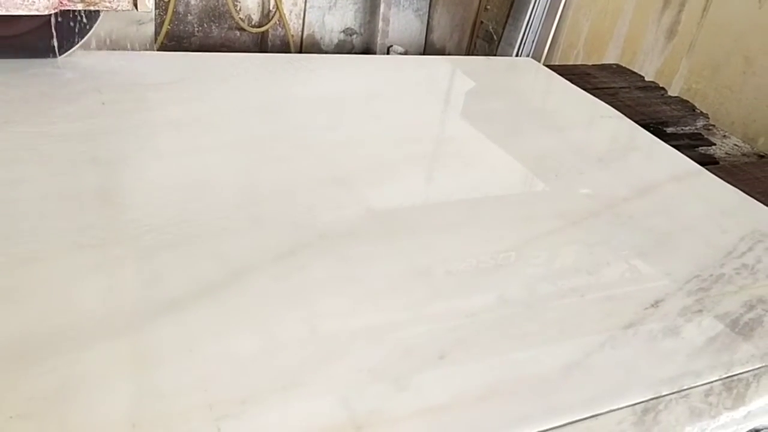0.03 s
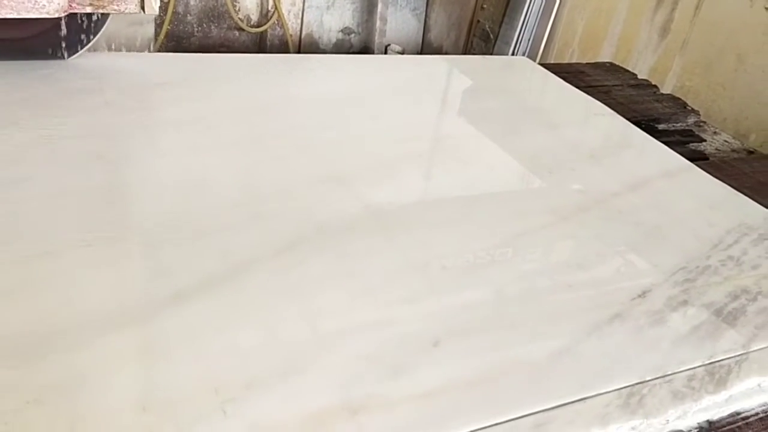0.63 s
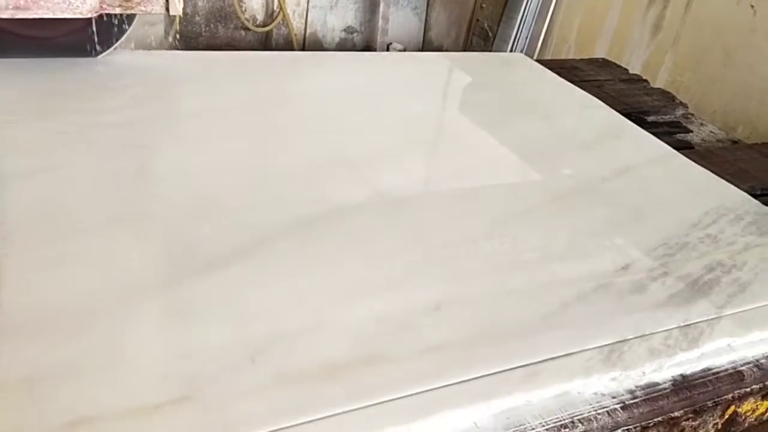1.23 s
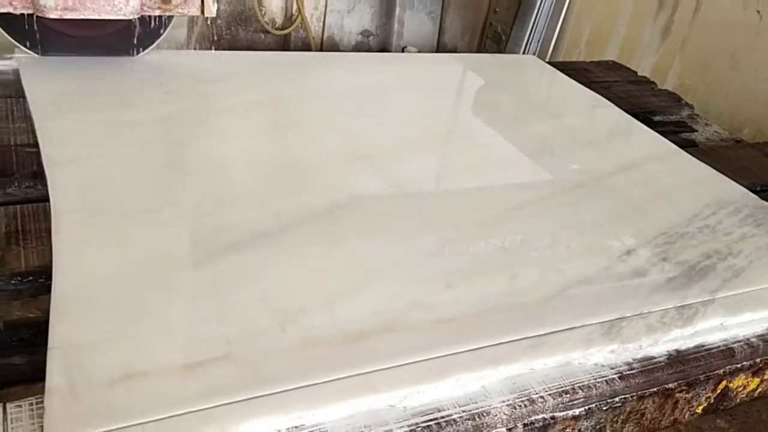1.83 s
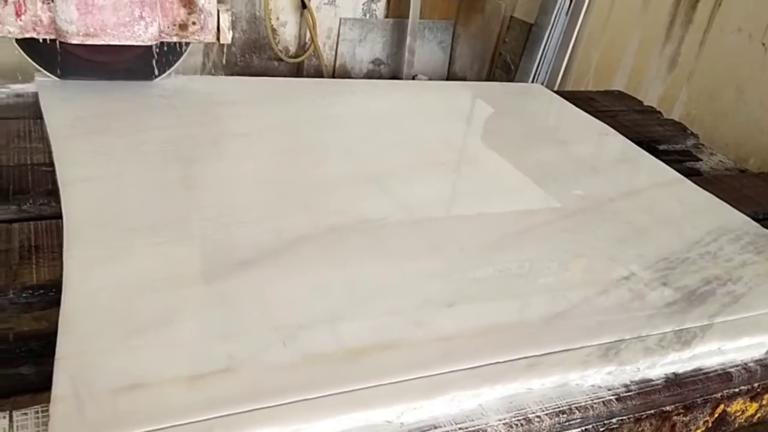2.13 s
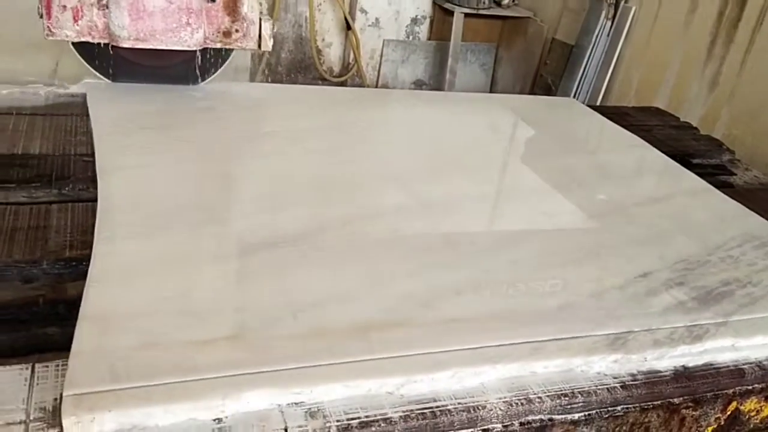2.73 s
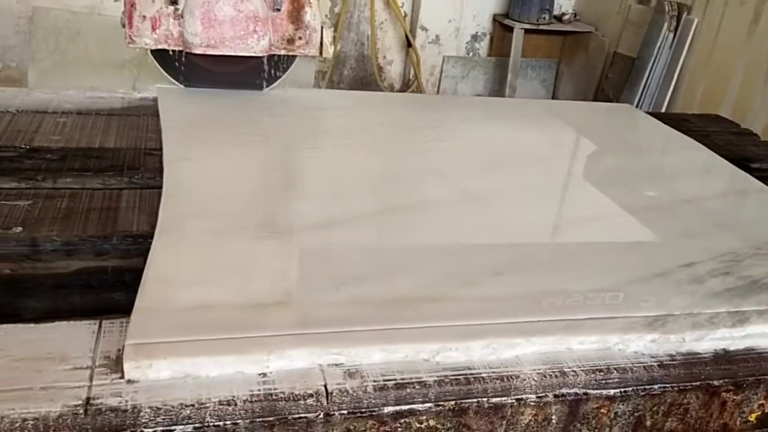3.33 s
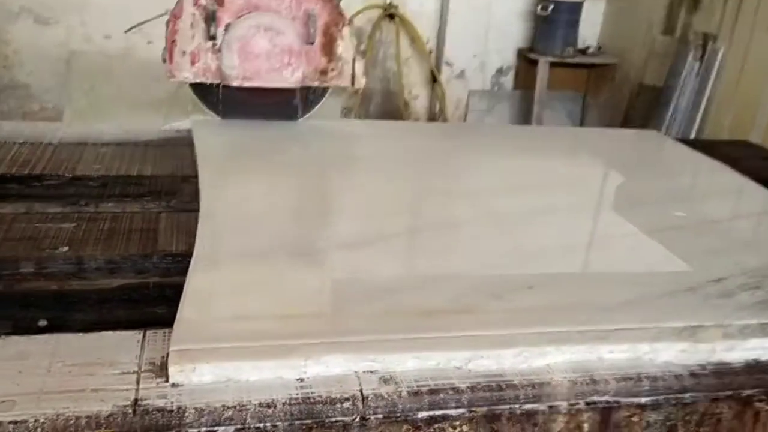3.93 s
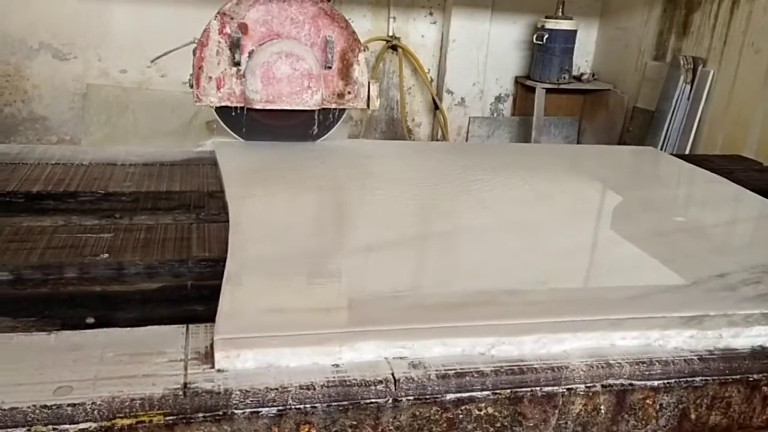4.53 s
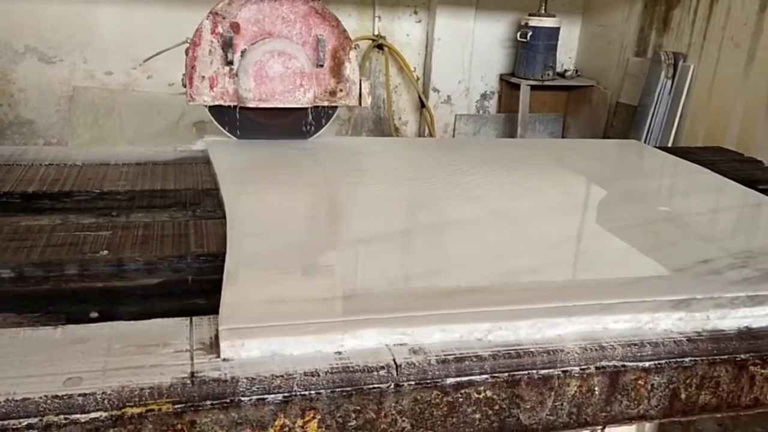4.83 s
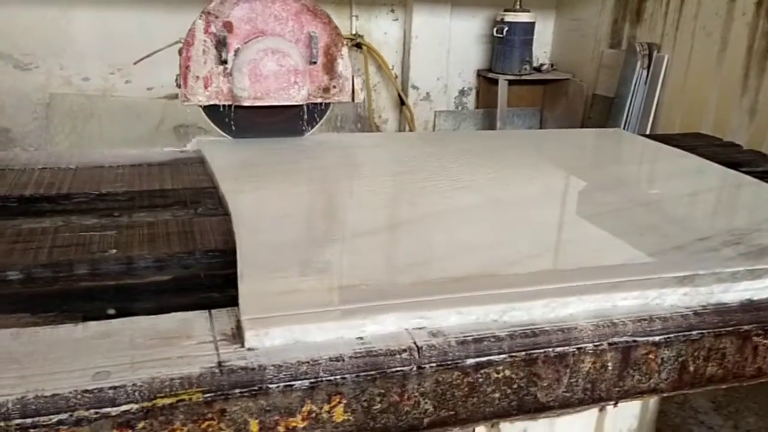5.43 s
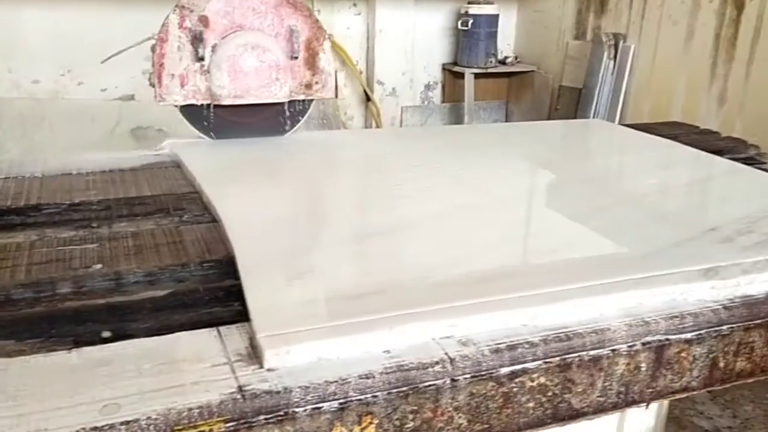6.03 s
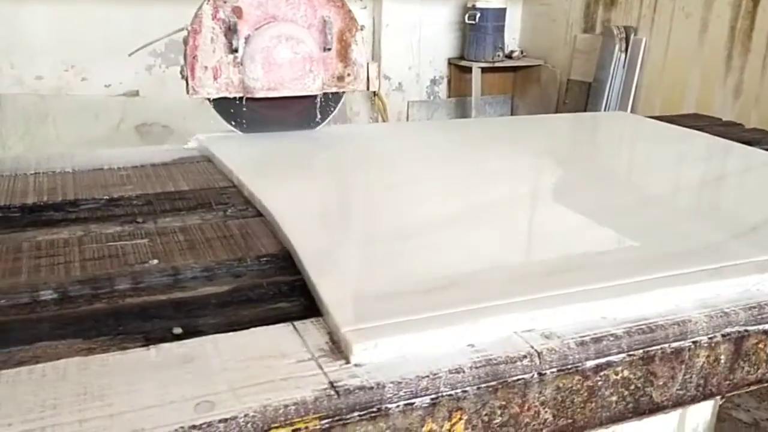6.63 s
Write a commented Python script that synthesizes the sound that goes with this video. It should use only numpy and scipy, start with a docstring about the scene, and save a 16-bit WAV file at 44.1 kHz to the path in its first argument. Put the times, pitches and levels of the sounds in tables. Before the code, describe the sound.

In a stone workshop, a circular saw is already cutting, a loud gritty grind with a metallic ring and short squeals at changing pitches. Beneath it runs a quieter, wavering machine drone, and above it a fine hiss of spray. Light thuds and finger rumble touch the nearby stereo microphone at the start, mostly on the right. The cut carries on throughout, changing colour as the microphone is carried around the blade.

```python
"""Bridge saw in wet marble

A stone workshop, the stereo microphone carried along the saw table from the blade's edge to its face.
The rim grinds almost the same pattern every turn, so the steel blade rings in combs of shaft orders;
single modes flare up as it rubs. The spindle drones under its guard and spray hisses.
In the first second, handling bumps the right microphone port."""
import sys
import numpy as np
from scipy import signal
from scipy.fft import rfft, irfft
from scipy.io import wavfile
from scipy.ndimage import uniform_filter1d

SR = 44100
rng = np.random.default_rng(int(sys.argv[2]) if len(sys.argv) > 2 else 0)


def transcribe(u):
    """Save the signal u as a 16-bit wav file named by the first command-line argument.

    u: samples, shape (n,) or (channels, n), limited to [-1, 1]; the rate is SR.
    q: integer samples, one column per channel.
    """
    v = np.clip(np.atleast_2d(u).T, -1, 1)
    q = np.round(v * 32767).astype(np.int16)
    wavfile.write(sys.argv[1], SR, q)


N = 295470
TIME = np.arange(N) / SR

SHAFT_HZ, BELT_HZ = 25.113, 3.42  # a shaft order is a multiple of SHAFT_HZ
LONG_WAVE_HZ = 870  # below this the cut sounds much the same from everywhere
SPRAY_HZ = 8750  # above this the spray takes over from the blade


def amp(db):
    """Decibels to gain."""
    return 10 ** (np.asarray(db) / 20)


def unit(x):
    """Scales to an rms of one."""
    return x / np.sqrt(np.mean(abs(x) ** 2) + 1e-20)


def across(points, hz):
    """Reads rows of (Hz, value) on a log-frequency axis."""
    f, value = np.transpose(points)
    return np.interp(np.log(hz + 1), np.log(f + 1), value)


def along(points, t):
    """Reads rows of (seconds, value) at the times t."""
    return np.interp(t, *np.transpose(points))


def swing(curve, t):
    """A level curve in dB about its own average."""
    db = along(curve, t)
    return db - db.mean()


def spectra(x):
    """Short-time spectra, for shaping the cut's colour and ring over time."""
    return signal.stft(x, SR, nperseg=2048, noverlap=1536)


def drift(rate_hz):
    """A slow, complex random wander with an rms near one."""
    t = np.arange(0, 8, .005)
    hz = np.fft.fftfreq(len(t), t[1])
    noise = rng.standard_normal((len(t), 2)) @ [1, 1j]
    return np.interp(TIME, t, unit(np.fft.ifft(noise / (1 + (hz / rate_hz) ** 2))))


def patches(shape, size):
    """Smooth random blotches over frequency and time; size is (bins, frames)."""
    field = rng.standard_normal(shape)
    for axis in (0, 1, 0, 1):
        field = uniform_filter1d(field, size[axis], axis, mode="wrap")
    return unit(field)


def belt_angle(t, top_s=.335):
    """Angle of the drive belt on its lap, in radians."""
    return 2 * np.pi * BELT_HZ * (t - top_s)


def shaft_turns(wobble_hz=.028, ease_hz=.03, ease_s=5.5):
    """Turns made by the shaft: its speed wobbles with the belt and rises as the load eases."""
    eased = np.clip((TIME - ease_s) * BELT_HZ + .5, 0, 1)
    return np.cumsum(SHAFT_HZ + wobble_hz * np.cos(belt_angle(TIME)) + ease_hz * eased) / SR


def rim_scrape(memory_s=0.62, oversample=10):
    """One turn's scrape comes round again and again; its orders slip in phase as the stone wears."""
    # Uneven rim segments whine steadily. Each row: shaft order, dB above the other orders.
    whine = [(35, 5), (43, 4), (48, 3), (52, 4), (54, 5), (63, 6), (74, 5), (99, 2), (130, 2), (177, 5),
             (264, 4)]
    turn_samples = round(SR / SHAFT_HZ)
    strength = np.ones(turn_samples // 2 + 1)
    for order, db in whine:
        strength[round(order)] = amp(db)
    slips = rng.standard_normal((2, N // turn_samples + 2, len(strength)))
    slips *= np.sqrt(2 / (SHAFT_HZ * memory_s))
    phase = 2 * np.pi * rng.random((2, 1, len(strength))) + np.cumsum(slips, axis=1)
    track = irfft(strength * np.exp(1j * phase), oversample * turn_samples).reshape(2, -1)
    place = shaft_turns() * oversample * turn_samples
    return unit(np.array([np.interp(place, np.arange(len(side)), side) for side in track]))


def blade_ring(hz, steel_db=2.5, damping=0.66):
    """Gain over frequency: the steel blade's modes stand above a bed of grit."""
    # Blade modes. Each row: pitch in Hz, half width in Hz before damping scales it, relative dB.
    modes = [(802.0, 54.0, -8.5), (886.0, 34.0, -5.5), (1110.0, 47.0, -11.5), (1213.0, 33.0, -1.5),
             (1348.0, 37.0, -6.0), (1452.0, 57.0, -4.0), (1578.0, 38.0, -3.5), (1736.0, 194.0, -10.0),
             (1955.0, 59.0, -6.0), (2159.0, 50.0, -7.5), (2236.0, 37.0, -3.0), (2484.0, 35.0, -3.0),
             (2566.0, 43.0, -8.0), (2730.0, 141.0, -8.5), (2870.0, 50.0, -3.0), (3033.0, 52.0, -2.0),
             (3242.0, 66.0, -1.5), (3423.0, 95.0, -7.0), (3573.0, 100.0, -4.0), (3714.0, 47.0, -5.0),
             (3844.0, 54.0, -4.5), (4013.0, 29.0, -3.0), (4177.0, 34.0, -3.5), (4448.0, 24.0, 1.0),
             (4768.0, 81.0, -3.0), (5074.0, 116.0, -3.5), (5553.0, 127.0, -10.5), (5944.0, 108.0, -10.5),
             (6218.0, 70.0, -10.0), (6426.0, 65.0, -6.5), (6612.0, 95.0, -2.0), (6850.0, 61.0, -5.0),
             (7115.0, 48.0, -3.5), (7390.0, 127.0, -9.0), (7718.0, 98.0, -12.5)]
    # Crushed stone and spray between the modes. Each row: frequency in Hz, relative level in dB.
    grit = [(30.0, -44.0), (100.0, -26.5), (300.0, -13), (560.0, -15), (700.0, -17.5), (1020.0, -20),
            (1300.0, -13.5), (2000.0, -15.5), (2700.0, -13), (3600.0, -32.5), (4500.0, -6.5), (5300.0, -15),
            (7400.0, -25), (8100.0, -19.5), (9500.0, -17.5), (10400.0, -21), (11300.0, -11),
            (12400.0, -9.5), (13400.0, -14.5), (15000.0, -15)]
    steel_power = sum(amp(db + steel_db) ** 2 / (1 + ((hz - f) / (damping * width)) ** 2) ** 2
                      for f, width, db in modes)
    return np.sqrt(steel_power + amp(across(grit, hz)) ** 2)


def squeals(hz, t, base_width_hz=13, loss=0.015):
    """Lift in dB as the blade rubs in the kerf: single modes swell, hold and let go."""
    # Each row: middle in seconds, length in seconds, pitch in Hz, lift in dB.
    flares = [(0.0, 1.8, 3071.0, 11.5), (0.3, 1.0, 2474, 7.5), (0.47, 0.81, 1759.0, 8.5),
              (0.65, 0.43, 4665.0, 10.5), (0.98, 0.16, 3300, 14), (1.03, 0.16, 2557.0, 6.5),
              (1.07, 0.32, 2232.0, 13.0), (1.1, 0.37, 4336.0, 8.5), (1.35, 0.13, 3358.0, 5.5),
              (1.37, 0.26, 3808.0, 9.5), (1.37, 0.4, 1858.0, 18.5), (1.42, 0.26, 4445, 10),
              (1.42, 0.32, 2486, 16), (1.46, 0.65, 1456.0, 7.0), (1.58, 0.31, 1982.0, 12.0),
              (1.91, 0.81, 4085.0, 9.5), (1.92, 0.3, 4445, 7.5), (2.0, 1.31, 1751.0, 13.5),
              (2.05, 0.27, 2812.0, 10.0), (2.14, 0.69, 2227.0, 11.5), (2.18, 0.52, 2485, 14.5),
              (2.19, 0.23, 1583.0, 13.0), (2.51, 0.22, 6229.0, 13.5), (2.56, 0.16, 6877.0, 4.5),
              (2.79, 0.21, 4093.0, 12.0), (2.85, 0.22, 1356.0, 14.0), (2.96, 0.43, 2456, 9),
              (3.0, 0.19, 3489.0, 12.0), (3.14, 0.16, 4442.0, 8.0), (3.21, 0.5, 1694.0, 12.5),
              (3.31, 0.65, 2761.0, 12.5), (3.48, 0.35, 2159.0, 10.0), (3.58, 0.15, 1374.0, 7.5),
              (3.6, 2.88, 1553.0, 7.0), (3.8, 0.28, 3254.0, 9.0), (3.94, 0.27, 2486, 14),
              (3.97, 0.41, 5485.0, 12.5), (3.98, 0.36, 2854.0, 9.0), (4.01, 0.36, 5149.0, 13.0),
              (4.04, 0.25, 2236.0, 9.0), (4.11, 0.32, 3572.0, 10.5), (4.22, 0.8, 3001.0, 9.0),
              (4.26, 0.2, 4353.0, 11.0), (4.34, 0.13, 2814.0, 14.0), (4.44, 0.89, 1618.0, 10.0),
              (4.55, 0.54, 1782.0, 8.5), (4.56, 0.13, 4013.0, 10.5), (4.58, 0.3, 2460, 11),
              (4.6, 1.62, 6022.0, 12.0), (4.89, 0.24, 4640.0, 9.0), (5.01, 0.23, 2550.0, 8.5),
              (5.01, 0.44, 1980.0, 8.5), (5.03, 0.15, 3022.0, 12.5), (5.07, 0.11, 6434.0, 12.5),
              (5.15, 0.54, 6640.0, 10.0), (5.19, 0.24, 4446, 10.5), (5.2, 0.59, 1583.0, 9.5),
              (5.48, 0.2, 4448, 5.5), (5.58, 0.55, 2160.0, 13.0), (5.66, 0.18, 1604.0, 7.5),
              (5.76, 0.65, 1347.0, 7.0), (5.85, 0.3, 4450, 5), (6.15, 0.2, 4000.0, 12.0),
              (6.28, 0.59, 6022.0, 7.5), (6.31, 0.29, 3541.0, 8.5), (6.44, 0.14, 2783.0, 14.5),
              (6.45, 0.8, 1584, 7), (6.5, 1.16, 4773.0, 6.0), (6.64, 2.21, 4182.0, 6.0),
              (6.67, 0.26, 3841.0, 16.0), (6.67, 0.37, 5145.0, 6.5)]
    middle, length, pitch, db = np.transpose(flares)
    half_width = base_width_hz + loss * pitch
    ringing = np.exp(-np.minimum(((hz[:, None] - pitch) / half_width) ** 2, 20))
    held = np.exp(-np.minimum((2 * (t[:, None] - middle) / length) ** 4, 20))
    return (db * ringing) @ held.T


def microphone_walk(hz, t):
    """Change of colour in dB as the microphone is carried from the blade's edge round to its face."""
    # Each row: time in seconds, position from 0 (edge-on) to 1 (face-on).
    travel = [(0.0, 0.0), (1.5, 0.1), (2.3, 0.16), (2.9, 0.31), (3.5, 0.64), (4.6, 0.31), (5.3, 1),
              (6.0, 1.0), (6.7, 0.98)]
    # Colour against that heard halfway round. Each row: frequency in Hz, edge-on dB, face-on dB.
    views = [(860, -8, 1.5), (1420, -6, 3), (1850, -5, 0), (2830, 0.5, -2.5), (3470, 5, -5.5),
             (4080, 2.0, -2.5), (4380, -2, 2), (4910, -9.5, -6.5), (5680, -2.5, 5), (6400, 0.5, -3.5),
             (7200, 1.5, 3), (7800, 3.5, 0), (9000, -1.5, -3), (10400.0, 9.5, 3.5), (11120, -17.5, -6),
             (12800, -9, -13.5), (13300, -11, 2.5), (14600, 6.5, -2)]
    side = 2 * along(travel, t) - 1
    edge_on, face_on = (across(np.array(views)[:, [0, column]], hz) for column in (1, 2))
    return np.outer(edge_on, np.maximum(-side, 0)) + np.outer(face_on, np.maximum(side, 0))


def cut_swell(hz, t, low_hz=850, low_spread_hz=446, mid_hz=2190, mid_spread_hz=500):
    """Swell in dB: two groups of modes and the spray go their own way, the rest follows the bite."""
    # Low modes, middle modes, spray and the rim's bite. Each row: time in seconds, relative dB.
    low_ring = [(0.0, -7.5), (0.84, 0.5), (1.28, -3.5), (1.67, 3.5), (2.23, -1.5), (2.53, 8.5), (3.6, 1),
                (4.2, 1), (4.95, 2.5), (5.11, -5.0), (6.7, -2.5)]
    mid_ring = [(0.0, -0.5), (1.23, 3), (1.63, -3.5), (2.04, -0.5), (2.46, 0.5), (2.7, -5), (3.1, -4.5),
                (3.4, 2), (3.97, -0.5), (4.23, 0.5), (4.8, 3.5), (5.2, -3), (5.7, 2.5), (6.7, 6.5)]
    spray = [(0.0, 3), (0.12, -5), (0.43, 0), (1.65, 0), (2.22, -2.5), (2.5, 1.0), (3.23, -5.5), (3.45, 2),
             (4.05, -1), (5.15, -2.5), (5.64, 2.5), (6.7, 1.5)]
    bite = [(0.0, 3), (0.05, 0.5), (0.09, -3), (0.15, -8), (0.18, 2), (0.36, 0.5), (0.41, -3.5),
            (0.48, 0.5), (0.85, 0), (0.98, -0.0), (1.2, -2), (1.35, 1.5), (1.75, 2.5), (1.93, 2.0),
            (2.22, -2.5), (2.42, 3.0), (2.65, 1.5), (2.95, 1), (3.18, -4), (3.33, 1), (3.62, 2.5),
            (3.75, 0.5), (4.05, -1.5), (4.4, 1), (4.72, -0.5), (4.85, 2.5), (5.15, -1), (5.5, 4), (6.7, 3)]
    low = np.exp(-((hz - low_hz) / low_spread_hz) ** 2)
    mid = np.exp(-((hz - mid_hz) / mid_spread_hz) ** 2)
    high = 1 - 1 / (1 + (hz / SPRAY_HZ) ** 12)
    bands = [(low, low_ring), (mid, mid_ring), (high, spray), (1 - low - mid - high, bite)]
    return sum(np.outer(share, swing(curve, t)) for share, curve in bands)


def contact_wander(hz, t, depth_db=2.5, full_above_hz=2050):
    """The point of contact wanders, so modes swell and fade by chance, low ones less; in dB."""
    reach = np.sqrt(np.minimum(hz / full_above_hz, 1))[:, None]
    return depth_db * patches((len(hz), len(t)), size=(4, 11)) * reach


def spray_surge(hz, t, patchy_db=2.0, surge_db=0.72):
    """The spray's colour drifts and its hiss surges with the belt; in dB."""
    colour_db = patchy_db * patches((len(hz), len(t)), size=(10, 36))
    return (colour_db - surge_db * np.cos(belt_angle(t))) * np.minimum(hz / SPRAY_HZ, 1)[:, None]


def microphone_ports(hz, direct, reflected, lead_s=0.000458):
    """The blade's direct ring reaches the right port first; reflections make the two ports differ."""
    # Each row: frequency in Hz, likeness of the ports from 0 to 1.
    likeness = [(200, 0.96), (450, 0.83), (700, 0.24), (1400, 0.21), (15000, 0.017)]
    # Each row: frequency in Hz, left minus right in dB.
    balance = [(200, 1.5), (450, 2), (800, 1), (1600, 3.5), (2300, 1), (2900, -4.5), (4200, 0), (6000, -1),
               (7000, 3.5), (8400, -0.5), (10500, 3.5), (12500, 5), (14500, 13)]
    lead = np.exp(2j * np.pi * hz * lead_s * (hz > LONG_WAVE_HZ))[:, None]
    alike = across(likeness, hz)[:, None]
    right = alike * lead * direct + np.sqrt(1 - alike ** 2) * reflected
    lean = amp(across(balance, hz))[:, None]
    return np.array([direct * lean, right]) / np.sqrt(1 + lean ** 2)


def cutting(level_db=-18.5):
    """The repeating scrape and freshly crushed grains drive the blade, with spray hissing on top."""
    # Grinding that repeats from turn to turn. Each row: frequency in Hz, share of the power.
    repeats = [(200, 0.33), (650, 0.02), (850, 0.7), (1600, 0.51), (3000, 0.53), (4500, 0.45), (6500, 0.13),
               (9000, 0)]
    hz, t, scrape = spectra(rim_scrape())
    grains = spectra(rng.standard_normal((2, N)))[2]
    # A squealing mode locks to the turning rim, so it rings purer than the grinding around it.
    squeal_db = squeals(hz, t)
    fresh_share = (1 - across(repeats, hz))[:, None] / amp(squeal_db)
    direct, reflected = np.sqrt(1 - fresh_share) * scrape + np.sqrt(fresh_share) * grains
    # Long waves hardly notice where the microphone is or how hard the rim bites.
    reach = np.minimum(hz / LONG_WAVE_HZ, 1)[:, None]
    lift_db = (microphone_walk(hz, t) + cut_swell(hz, t)) * reach
    lift_db += contact_wander(hz, t) + spray_surge(hz, t) + squeal_db
    heard = microphone_ports(hz, direct, reflected) * blade_ring(hz)[:, None] * amp(lift_db)
    cut = signal.istft(heard, SR, nperseg=2048, noverlap=1536)[1]
    return amp(level_db) * unit(cut[:, :N])


def order_swell(order, hum_top_order=12, segments=18):
    """Gain of one shaft order over time: each part of the drone swells on its own."""
    # From low to high: spindle hum, boom under the guard, the rim segments' tone, the throb above it.
    # Each row: time in seconds, relative level in dB.
    hum = [(0.0, -44), (0.8, -33), (0.93, -38), (1.57, -43), (1.96, -39), (2.13, -51.5), (2.52, -35),
           (2.67, -48), (5.67, -51.5), (5.75, -42.5), (6.7, -61)]
    boom = [(0.0, -45), (0.43, -45), (0.82, -36.5), (0.99, -56), (1.12, -43.5), (2.35, -44), (2.76, -34),
            (3.43, -32.5), (4.94, -37), (6.7, -59)]
    segment_tone = [(0.0, -26), (0.07, -47), (0.67, -33.5), (2.29, -39.5), (2.59, -26.5), (3.55, -21),
                    (4.72, -34), (4.83, -23.5), (5.06, -19.5), (5.19, -29.5), (5.52, -22.5), (5.9, -39),
                    (6.7, -57)]
    throb = [(0.0, -29), (0.07, -37.5), (0.69, -28), (2.14, -37), (3.53, -31), (4.68, -37), (4.98, -29),
             (6.57, -38), (6.7, -37)]
    if order < segments:
        curve = hum if order <= hum_top_order else boom
    else:
        curve = segment_tone if order == segments else throb
    return unit(amp(swing(curve, TIME)))


def spindle_drone(gain_db=-34.5, waver=0.38, rattle_db=-17, apart=0.25):
    """Shaft orders beat together into a throb, each wavering with the load over a little rattle."""
    # Tones of spindle and guard. Each row: shaft order, relative level in dB.
    orders = [(7, -35), (8, -16), (9, -20), (10, -13), (11, -23.5), (12, -20.5), (13, -12), (14, -4.5),
              (15, -8.5), (16, -12), (17, -14), (18, 0.5), (19, -6.5), (20, -6.5), (21, -19), (22, -32),
              (23, -27)]
    out, turns = np.zeros((2, N)), shaft_turns()
    for order, db in orders:
        load = 1 + waver * drift(rate_hz=3.4)
        load += amp(rattle_db - db / 2) * drift(rate_hz=25)  # weak orders stand less clear of the rattle
        room = apart * drift(rate_hz=0.71)
        tone = amp(db) * order_swell(order) * np.exp(2j * np.pi * (order * turns + rng.random()))
        out += np.array([(load + room) * tone, (load - room) * tone]).real
    return amp(gain_db) * np.sqrt(2) * out


def handling(air_db=-82, grip_db=-34.5, settle_s=0.79, rub_gain_db=4, left_db=-19):
    """Steady air, a settling grip and fingers rumble, and bumps thud, nearly all at the right port."""
    # Colour of the rumble. Each row: frequency in Hz, relative level in dB.
    rumble_colour = [(20, -42), (45, -34), (75, -16), (120, -11), (200, -10), (400, -19), (900, -23.5),
                     (3000, -42)]
    # Fingers rub near the port. Each row: middle in seconds, length in seconds, relative level in dB.
    rubs = [(0.007, 0.073, -39), (0.31, 0.13, -44), (0.756, 0.26, -37), (1.97, 0.04, -50),
            (5.653, 0.2, -53)]
    # Pressure pulses. Each row: time in seconds, peak in dB, seconds to the peak (also sets the width).
    bumps = [(.004, -21, 0.00076), (0.07, -22, 0.0028), (0.245, -22, 0.0025), (0.282, -22, 0.0026),
             (0.36, -16.5, 0.0015), (0.381, -14, 0.0022), (.615, -17, 0.0022)]
    colour = amp(across(rumble_colour, np.fft.rfftfreq(N, 1 / SR)))
    rumble = unit(irfft(rfft(rng.standard_normal((2, N))) * colour, N))
    stir = amp(air_db) + amp(grip_db) * np.exp(-TIME / settle_s)
    for middle, length, db in rubs:
        stir += amp(db + rub_gain_db) * np.exp(-(2 * (TIME - middle) / length) ** 2)
    out = rumble * stir
    for start, db, width in bumps:
        from_peak = (TIME - start) / width - 1
        out += amp(db) * np.cos(2 * from_peak) * np.exp(-from_peak ** 2 / 4)
    return out * amp([[left_db], [0]])


def scene():
    """The cut, the machine's drone and the hand on the microphone."""
    return cutting() + spindle_drone() + handling()


def record(dry):
    """The recorder's band limit: a steep low-pass."""
    edge_hz = 15600
    taps = signal.firwin(511, edge_hz, window=("kaiser", 9), fs=SR)
    return signal.oaconvolve(dry, taps[None], "same")


dry = scene()
out = record(dry)
transcribe(out)
```